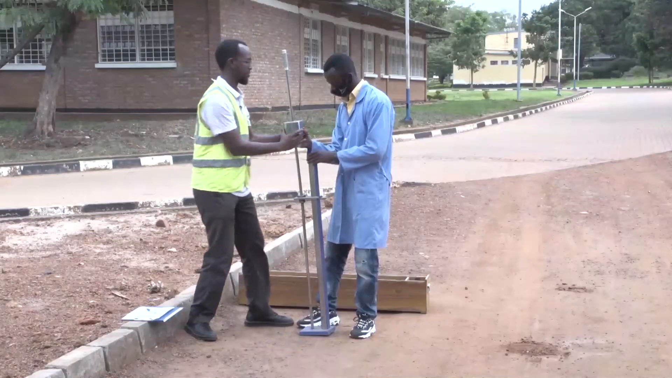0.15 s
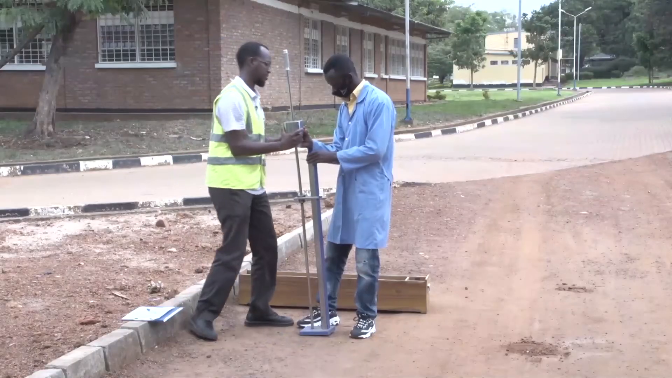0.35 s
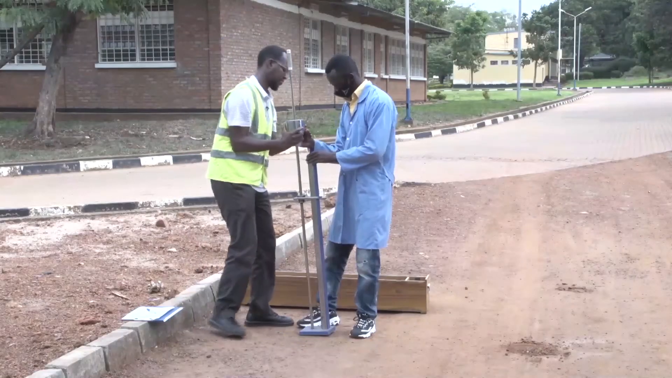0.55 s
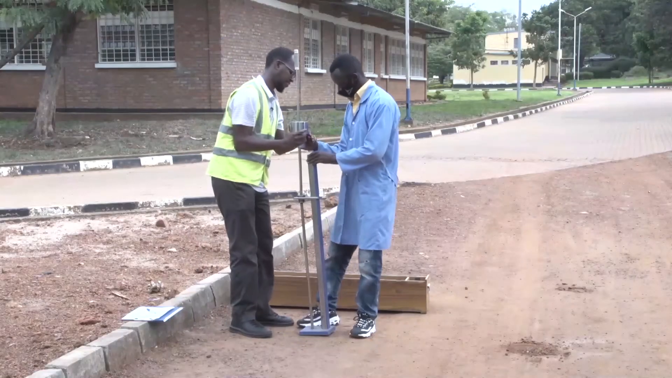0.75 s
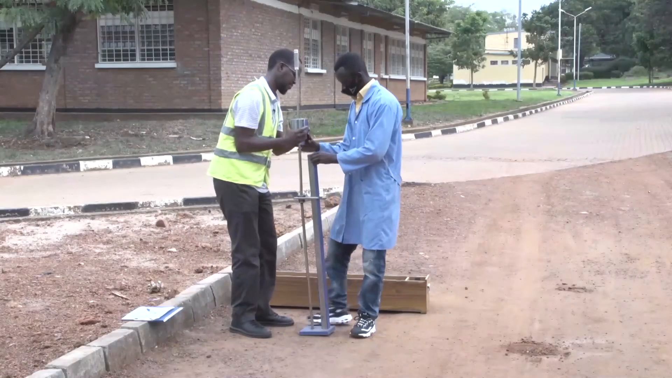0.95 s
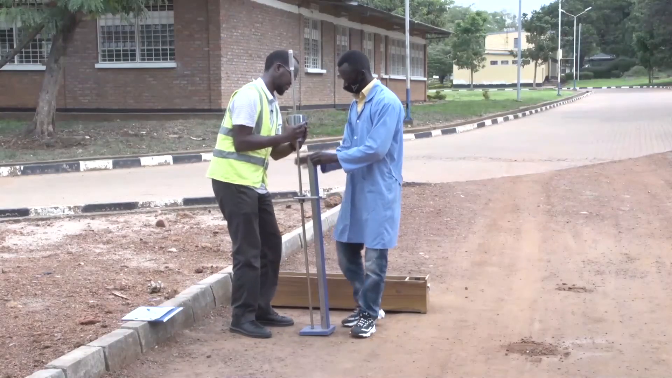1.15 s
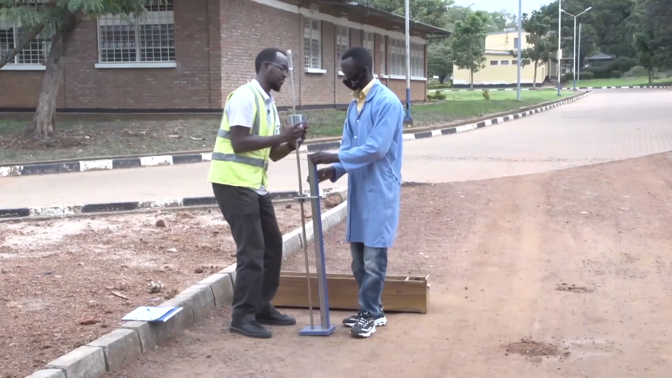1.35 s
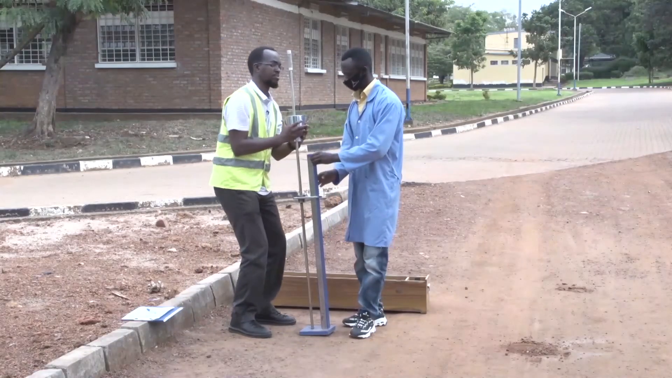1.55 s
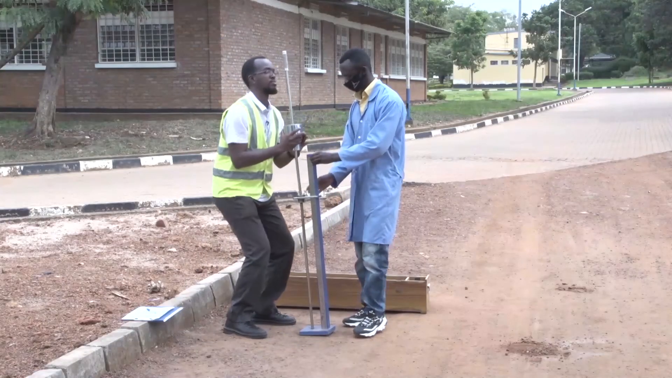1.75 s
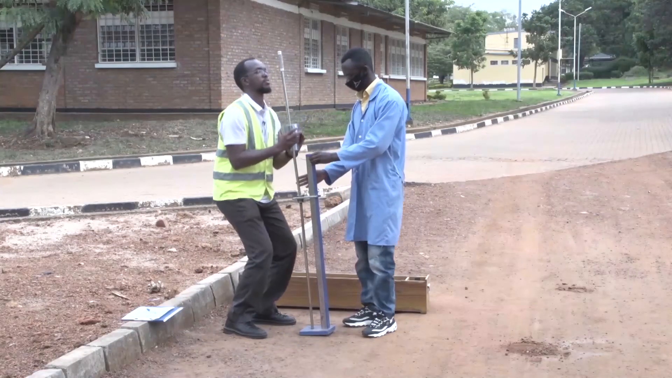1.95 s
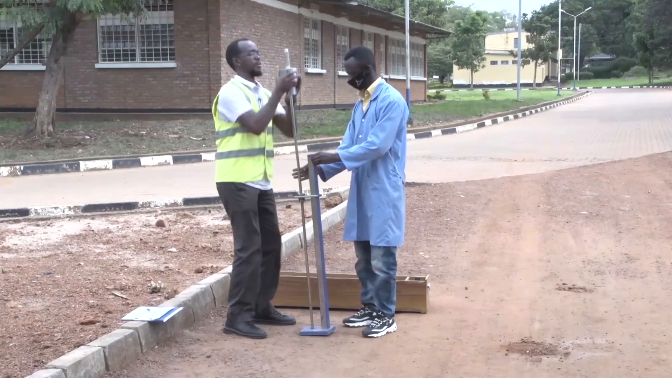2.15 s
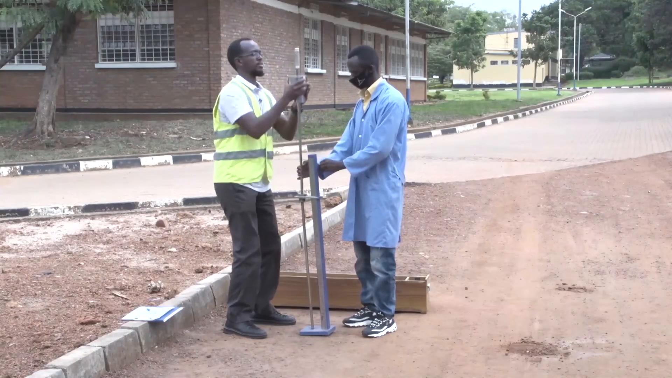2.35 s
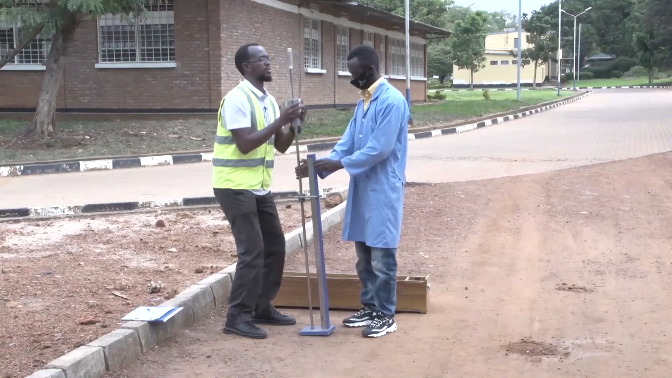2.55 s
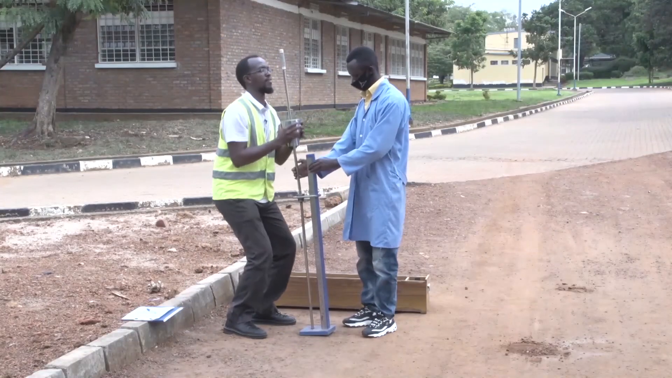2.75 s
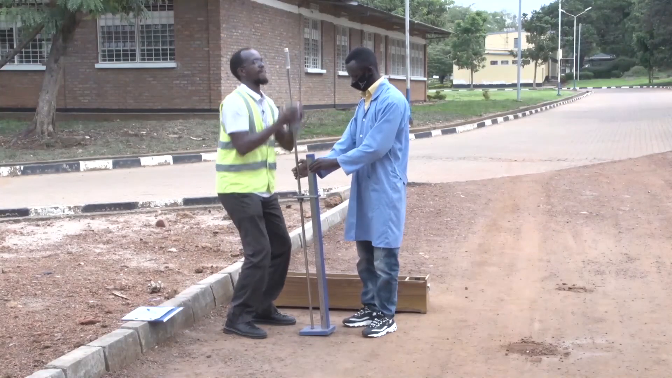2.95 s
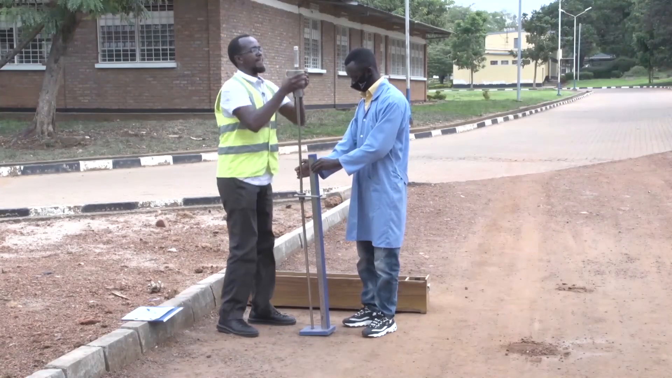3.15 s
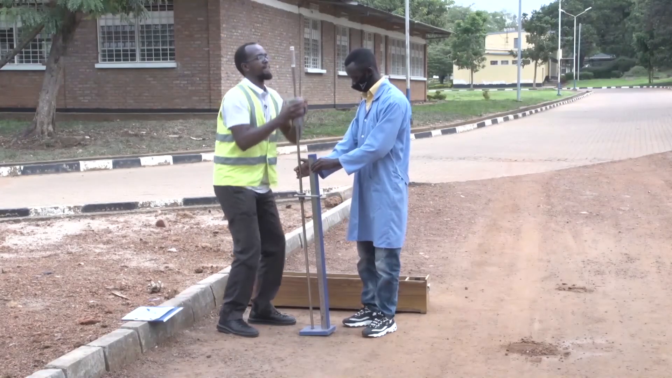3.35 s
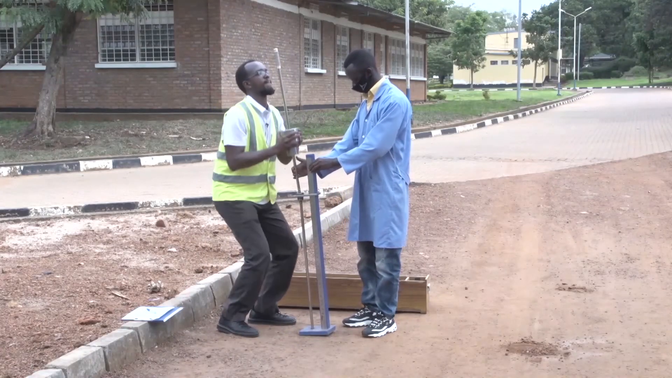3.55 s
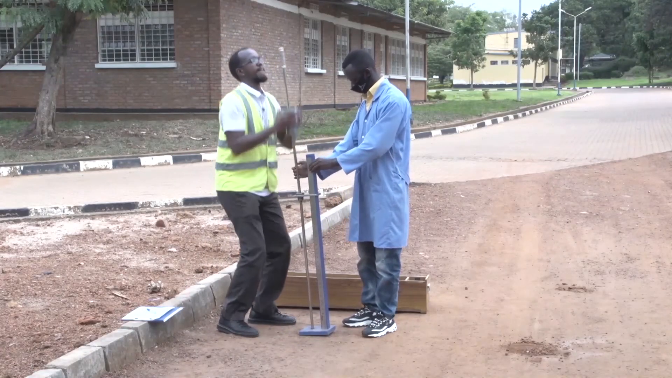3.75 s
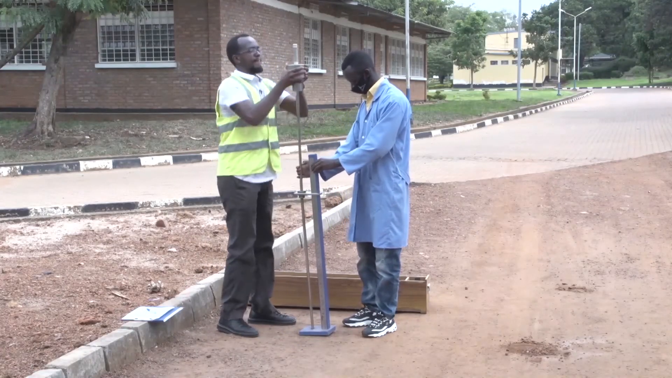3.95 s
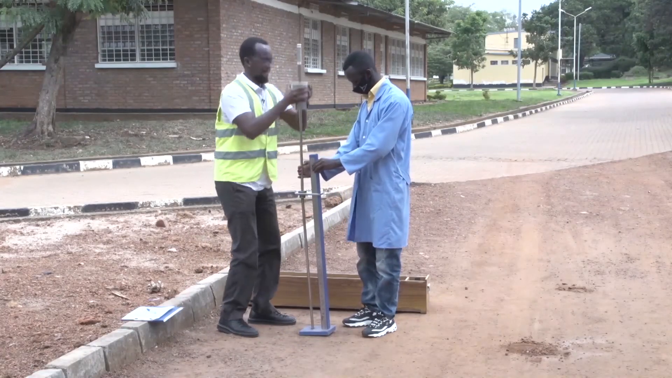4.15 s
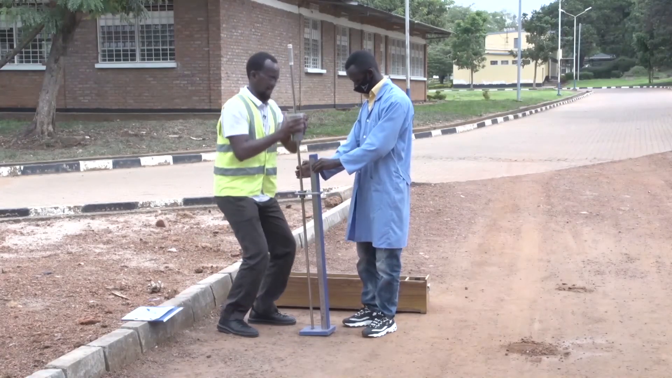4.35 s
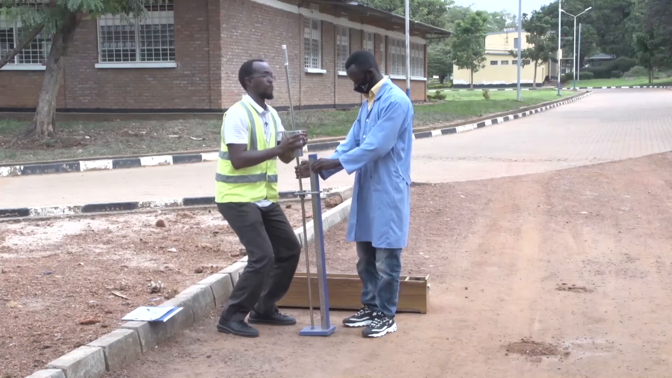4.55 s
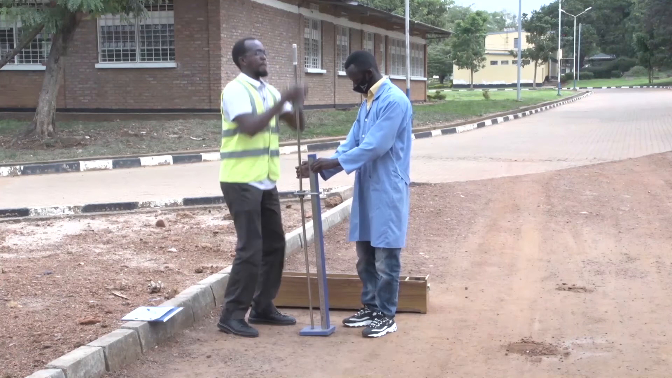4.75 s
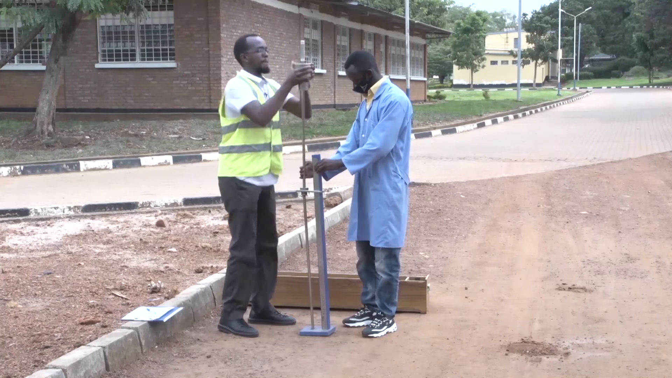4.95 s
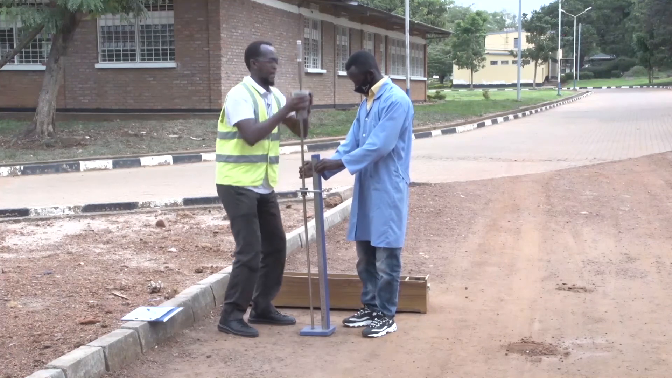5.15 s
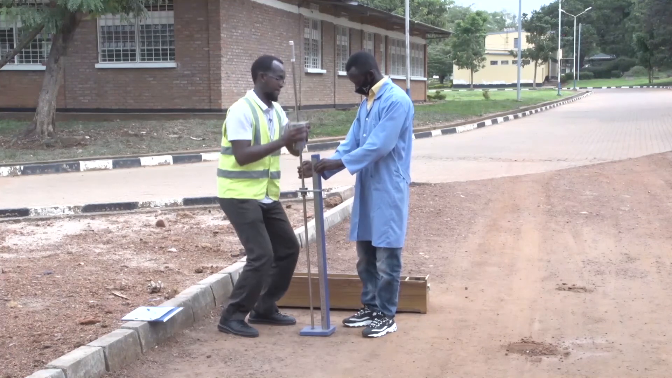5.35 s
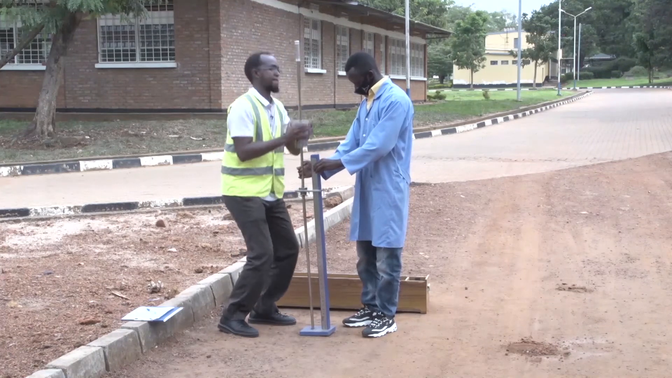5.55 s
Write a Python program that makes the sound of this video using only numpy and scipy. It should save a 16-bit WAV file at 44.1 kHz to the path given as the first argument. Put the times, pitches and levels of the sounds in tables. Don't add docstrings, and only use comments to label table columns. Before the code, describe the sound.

A steel weight scrapes up its rod and slams a handle four times with sharp, overloaded metallic clanks, squeaking back down between blows outdoors.

```python
import sys
import numpy as np
from scipy import signal
from scipy.fft import rfft, irfft
from scipy.io import wavfile
from scipy.ndimage import uniform_filter1d

SR = 44100
rng = np.random.default_rng(int(sys.argv[2]) if len(sys.argv) > 2 else 0)


def voltage_ratio(level):
    return 10 ** (np.asarray(level, float) / 20)


def bounce(signal):
    frames = np.transpose(np.atleast_2d(signal))
    limited = np.clip(frames, -1, 1)
    pcm = np.round(limited * 32767).astype(np.int16)
    wavfile.write(sys.argv[1], SR, pcm)


N = 247401

# time in seconds, traffic level in dB, motor hum level in dB.
STREET = [(0, -63, -86), (.55, -66, -78), (1.22, -62.5, -69), (1.48, -64.5, -68), (2.09, -61, -73),
          (2.4, -62, -72), (2.97, -61.5, -74), (3.2, -60, -75.5), (3.4, -63, -69), (3.8, -63, -71),
          (4.2, -64.5, -76.5), (4.8, -61.5, -69.5), (5.35, -63.5, -79), (5.61, -62.5, -68.5)]
# frequency in Hz, level in dB per Hz.
TRAFFIC = [(15, -42.5), (25, -16), (54, 1), (75, -16.5), (123, 4), (155, -7), (248, -3), (320, -8.5),
           (499, -3), (2070, -21), (4000, -27.5), (5200, -58), (8800, -120)]
# frequency in Hz, level in dB.
HUM = [(129.2, 2), (258.4, -13.5)]
# frequency in Hz, level in dB per Hz.
HISS = [(880, -28), (1500, -7), (1660, -12), (3090, -12), (3620, -8), (4420, -11.5), (16000, -13)]
# time in seconds, gain in dB.
GAIN = [(0, 2), (1, 4.5), (2.19, 7.5), (2.21, -0.5), (5.61, -1.5)]
# frequency in Hz, left minus right in dB.
LEFT_BIAS = [(100, 2.5), (1000, 2), (4000, 2), (15000, 2)]
# start in seconds, length in seconds, level in dB.
SCUFFS = [(0.248, 0.07205, -70.5), (0.471, 0.0443, -68), (0.863, 0.1739, -65.5), (1.188, 0.07144, -60.5),
          (1.695, 0.046, -62), (1.799, 0.4116, -64.5)]
# frequency in Hz, level in dB per Hz.
DIRT = [(800, 11), (1200, -2.5), (2200, -4.5), (3500, -11), (5000, -39.5)]
# start in seconds, peak in dB, pitch in Hz, 60 dB decay in seconds.
KNOCKS = [(2.291, -38, 548.5, 0.02509), (2.33, -44, 62, .12), (2.343, -32, 579.7, 0.03209),
          (2.541, -46.5, 558, 0.0611), (3.138, -31.5, 550.8, 0.04886), (3.32, -48, 58, .12),
          (3.655, -42, 96.4, 0.08688), (3.925, -34.5, 45.19, 0.1082), (4.009, -39, 545, 0.02226),
          (4.863, -30, 550, .05), (4.9, -32, 566.1, 0.03702), (5.495, -42, 92.2, 0.12252)]
# start in seconds, peak in dB, knock in dB, chatter 60 dB decay in seconds, knock pitch in Hz.
TAPS = [(1.0847, -31.5, 3.5, 0.02564, 1666), (1.1023, -40.5, -1.5, 0.02879, 1510),
        (1.1745, -41, 7, 0.02693, 2090), (2.0706, -40, 4, 0.0165, 1945), (2.1034, -42, -2, 0.02027, 2100),
        (2.2517, -37.5, -1, 0.0196, 2991), (2.3425, -33.5, 0, 0.0417, 3025),
        (2.3504, -43, 7.5, 0.0757, 1497), (2.3796, -31, 5.5, 0.02005, 1733),
        (2.3889, -36, 3, 0.01766, 2860), (2.3943, -35.5, 9.5, 0.0515, 3277),
        (2.453, -44, 2.5, 0.03326, 1305), (2.5567, -54, 11, 0.02182, 2416),
        (2.626, -54.5, 13.5, 0.0295, 2997), (2.688, -51.5, 3.5, 0.04, 3114),
        (4.0086, -43.5, 12, 0.0178, 1900), (4.235, -52.5, 15.5, 0.02674, 3711),
        (4.8737, -27, -5.5, 0.01875, 2980)]
# start in seconds, peak in dB, knock in dB, level above 9 kHz in dB, knock pitch in Hz.
TICKS = [(1.134, -46, -3, -9, 2000), (1.924, -38, 14, -2.5, 1800), (2.004, -48.5, 7.5, -8.5, 3500),
         (2.329, -44, 12, -6.5, 1700), (2.422, -48, 6.5, -8.5, 2500), (2.7404, -56.5, 5.5, -7.5, 3000),
         (2.9022, -51, -3.5, -4.5, 2000), (3.274, -37, 1, 0, 1300), (3.4997, -44, -3, -9, 1800),
         (4.0715, -33, -1.5, 6, 1200), (4.1736, -53, 3, -5, 3000), (4.347, -35, 16, -5, 2250),
         (5.3652, -52.5, 13.5, -5.5, 2400)]
# frequency in Hz, level in dB.
TAP_MODES = [(2950, -3), (4200, -1), (4620, -3.5), (5850, -4), (6450, -7.5), (7000, -5.5), (7600, -0.5),
             (8720, -0.5), (9800, 1), (11300, 0.5), (13300, 0)]
# frequency in Hz, width in Hz, level in dB.
SQUEAL = [(1747.5, 120, -8), (1839.3, 91, 4), (1900, 210, 1)]
# frequency in Hz, width in Hz, level in dB.
RASP = [(3042, 170, -1.5), (3685.2, 130, -2), (3987, 400, 0), (5122.5, 480, -1.5), (5832, 66, -7),
        (5536, 660, -7), (7229.3, 110, -6.5), (8440, 120, -9.5), (9036, 170, -3.5), (10260, 200, -13)]
# frequency in Hz, level in dB per Hz.
GRIT = [(1200, -4.5), (2500, -2), (4500, -6), (7000, -10.5), (11000, -10.5), (15000, -20.5)]
# length in seconds, squeal in dB and rasp in dB at the top.
THROWS = [
    (0.2, -50.5, -49),
    (0.14, -50, -54.5),
    (0.2, -51, -56),
    (0.18, -50, -53),
]
# start in seconds, length in seconds, squeal in dB, rasp in dB.
DRAGS = [(2.488, 0.13697, -74, -70.5), (2.669, 0.09694, -66, -64.5), (3.28, 0.14, -66.5, -69),
         (3.38, 0.17, -69.5, -66), (3.502, 0.035, -63, -62.5), (3.557, 0.07544, -71.5, -72.5),
         (4.087, 0.1286, -69.5, -70), (4.214, 0.04735, -65, -67.5), (4.268, 0.06767, -63, -65.5),
         (4.325, 0.15226, -63, -71), (5.031, 0.1363, -66.5, -67), (5.134, 0.1261, -62, -64),
         (5.255, 0.14465, -57, -67), (5.561, 0.0985, -69, -70)]
# start in seconds, length in seconds, start pitch in Hz, end pitch in Hz, level in dB.
SQUEAKS = [(2.51, .05, 1650, 1750, -64), (2.57, .07, 1850, 1950, -64), (2.56, .09, 2600, 3100, -68),
           (2.955, .02, 3400, 3350, -60), (2.972, .02, 3700, 3600, -61), (3.03, .06, 8950, 8850, -66),
           (3.44, .09, 2200, 3200, -65), (3.855, .035, 8950, 8850, -62), (4.28, .04, 3350, 3250, -65),
           (4.28, .04, 2050, 2000, -62), (4.35, .1, 1850, 1900, -60), (4.69, .06, 1750, 2050, -62),
           (5.05, .08, 1800, 1650, -62), (5.19, .06, 2800, 3400, -64), (5.165, .035, 5000, 4950, -66),
           (5.17, .05, 6900, 6900, -68), (5.28, .08, 1850, 1950, -54), (5.35, .06, 1900, 1780, -57),
           (5.33, .08, 7700, 7900, -77), (5.15, .04, 9000, 8750, -71), (5.165, .04, 3350, 3600, -66)]
# middle in seconds, pitch in Hz, level in dB.
BITES = [(2.072, 1945, -55.5), (2.105, 2134, -53.5), (2.107, 8893, -55), (2.131, 1384, -53.5),
         (2.138, 3606, -57.5), (2.14, 4457, -53), (2.151, 3203, -57), (2.152, 2229, -49.5),
         (2.154, 4189, -53.5), (2.158, 8910, -58), (2.166, 2859, -56), (2.174, 1758, -55),
         (2.174, 3530, -51), (2.174, 8887, -59.5), (2.181, 4269, -52), (2.996, 2110, -60.5),
         (3.005, 2037, -62), (3.027, 2098, -66), (3.027, 9283, -65), (3.042, 1293, -56.5),
         (3.046, 8893, -61.5), (3.047, 2139, -55.5), (3.047, 4350, -66.5), (3.049, 3083, -63.5),
         (3.063, 2888, -58.5), (3.069, 3360, -60.5), (3.071, 8910, -70), (3.072, 1720, -51),
         (3.793, 3476, -62), (3.794, 2143, -57), (3.794, 8304, -68.5), (3.802, 6200, -65.5),
         (3.805, 8140, -67.5), (3.81, 3920, -59), (3.81, 9049, -68), (3.816, 2403, -64.5),
         (3.825, 6460, -62.5), (3.835, 3902, -56), (3.848, 3270, -60.5), (3.864, 2930, -63.5),
         (3.864, 3564, -66), (3.866, 1822, -55.5), (3.871, 8892, -62.5), (4.718, 1980, -58.5),
         (4.736, 2075, -60), (4.742, 4029, -59.5), (4.751, 2274, -57), (4.753, 8969, -64.5),
         (4.756, 4154, -64.5), (4.762, 1854, -54.5), (4.787, 1912, -57), (4.799, 3880, -67.5),
         (4.811, 3320, -63.5), (4.812, 1636, -57), (4.815, 6998, -64.5), (4.815, 8904, -63),
         (4.823, 1920, -53.5), (4.824, 5210, -55.5)]
# start in seconds, crack in dB, free ringing in seconds, thud in dB.
BLOWS = [
    (2.1961, -1, 0.0483, -9.5),
    (3.0929, -4, 0.05992, -15),
    (3.8945, -5, 0.044, -19),
    (4.8395, -7, 0.054975, -16),
]
# time in seconds, level in dB, 60 dB decay in seconds.
CONTACTS = [
    [(2.197, 0, 0.031), (2.2015, -4.5, 0.019), (2.2088, -18, .02), (2.2165, -30.5, .03),
     (2.237, -38, 0.03538), (2.245, -39.5, 0.03343)],
    [(3.0932, 1, 0.029593), (3.0958, -5, 0.03192), (3.1045, -18, .02), (3.1115, -25, .02),
     (3.119, -28.5, .03)],
    [(3.8953, -1.5, 0.03196), (3.8963, -1, 0.02456), (3.8987, -4, 0.01024), (3.9015, -12.5, 0.03701),
     (3.9125, -24, 0.02714), (3.9195, -29.5, .02), (3.926, -33, .03)],
    [(4.8398, -7, 0.0131), (4.8408, 3.5, 0.012684), (4.843, -13.5, 0.06329), (4.847, -13.5, 0.01699),
     (4.8495, -13.5, 0.0329), (4.865, -26, 0.04415)],
]
# frequency in Hz, level in dB per Hz.
CRACK = [(350, -43), (600, -13.5), (2040, -2), (4460, -10), (5190, -1), (6920, -11.5), (9890, -6),
         (10700, -10.5), (16000, -19.5)]
# frequency in Hz, 60 dB decay in seconds, levels in dB in blows 1, 2, 3, 4.
CLANK = [(171, 0.0066, -16.5, -19, -24, -21), (507.14, 0.041, -11.5, -17, -13, -19.5),
         (780, 0.02, -4, -6.5, -1, -8), (950, .025, -14, -18, -5, -16), (1187.8, 0.03, -12, -16, -19, -17),
         (1581.1, 0.047, -3, -20, -17, -21), (1950, .03, -16, -3, -18, -18),
         (2300, .02, -12, -10, -24, -12), (2920, .02, -16, -20, -4, -20), (5600, .015, -14, -8, -12, -4)]
# frequency in Hz, width in Hz, level in dB.
STEEL = [
    [(2090, 130, -4.5), (2666, 92, -5.5), (3534.8, 89, -9), (5159.2, 150, -1.5), (6363, 100, -9.5),
     (6835, 290, -14), (8075, 97, -14.5), (8720, 130, -6.5), (9128, 120, -9.5), (9740, 130, 0),
     (10324, 110, -9), (12070, 120, -13.5), (14255, 250, -18)],
    [(1590, 110, -1.5), (2740.2, 250, -8.5), (3470, 170, -11), (5280, 100, 1), (6400, 100, -5.5),
     (6740, 89, -5.5), (7600.8, 180, -3), (8714, 290, -7.5), (9964, 130, -2), (11073, 180, -9.5),
     (12128, 230, -7), (13500, 190, -11.5), (14500, 280, -9.5)],
    [(1900, 110, -6), (2879.5, 220, -3.5), (3360, 110, -7.5), (5210, 180, 1.5), (5560, 92, -9.5),
     (6673.4, 130, -7.5), (7406, 150, -12.5), (8631, 87, -12), (9843.5, 140, -6.5), (10111, 120, -16),
     (11663, 170, -15.5), (13266, 110, -12.5), (14240, 180, -18.5)],
    [(1731.9, 200, -2), (2915.2, 330, 1.5), (3320, 200, -3), (3988.9, 180, -3.5), (5351, 160, 0),
     (6163.2, 110, -9), (6553.1, 93, -13.5), (8040, 150, -6), (8680.6, 120, -9.5), (9689.8, 180, -6.5),
     (10419, 150, -14.5), (12466, 120, -12), (13400, 330, -15.5)],
]
STEEL_DB = [-10, -10, -9, -9]
# frequency in Hz, 60 dB decay in seconds, levels in dB in blows 1, 2, 3, 4.
RING = [(545, 0.36, -56.5, -39, -41, -36), (1096.2, 0.31, -60, -48.5, -44.5, -48),
        (1820, 0.21, -51.5, -43.5, -49, -38), (2030, 0.18, -52.5, -46.5, -50, -48),
        (2930, 0.11, -51, -45.5, -47.5, -39.5), (4124, 0.5, -54.5, -56, -51.5, -51.5),
        (4313, .2, -55, -49.5, -42, -49), (5218, .25, -47.5, -53, -43, -52.5),
        (6200, 0.31, -59, -46, -41, -36), (8781, .15, -48.5, -45.5, -51, -46.5),
        (9700, .12, -43.5, -52.5, -50, -44), (13350, .2, -58, -51, -53, -53.5),
        (14540, .2, -56.5, -55.5, -57, -32.5)]
# frequency in Hz, 60 dB decay in seconds, levels in dB in blows 1, 2, 3, 4.
LINGER = [(1826.7, .4, -66.5, -67, -60, -70), (4350, 0.36, -60.5, -69.5, -61.5, -64.5),
          (4655, .3, -65.5, -68.5, -60, -65.5), (5114.7, .9, -72, -72, -63.5, -71),
          (5110, .6, -70, -71, -65, -70), (5226, .3, -67, -65, -61, -67),
          (8835, 0.45, -69, -65.5, -63, -63), (9908, .3, -55, -63, -66, -66.5)]
# rattling tail in dB, far echoes in dB, ground boom in dB.
AFTERMATH = [
    (-39, -47, -29),
    (-36.5, -52, -27),
    (-35.5, -49, -27),
    (-35, -52, -31),
]
# frequency in Hz, level in dB per Hz.
TAIL = [(300, -8.5), (700, -5), (1800, -2), (4500, -4), (7000, -6.5), (10000, -7.5), (13000, -11.5),
        (16000, -17.5)]
# frequency in Hz, 60 dB decay in seconds.
TAIL_T60 = [(300, 0.055), (1500, 0.3), (5000, 0.18), (15000, 0.14)]
# frequency in Hz, level in dB per Hz.
FAR = [(900, -6.5), (2000, 0.5), (5000, -2), (9000, -4.5), (12000, -11.5), (15000, -21.5)]


def rms_one(x):
    return x / np.sqrt(np.mean(x ** 2) + 1e-20)


def peak_one(x):
    return x / np.abs(x).max()


def in_time(rows):
    s, *columns = np.transpose(rows)
    return [np.interp(np.arange(N) / SR, s, c) for c in columns]


def at_hz(points, hz):
    table_hz, values = np.transpose(points)
    return np.interp(np.log(hz), np.log(table_hz), values)


def add(track, s, sound):
    i = round(s * SR)
    track[i:i + len(sound)] += sound[:N - i]


def dying(t, t60):
    return voltage_ratio(-60 * t / t60)


def drift(rate, size=N):
    knots = rng.standard_normal(int(size / SR * 800) + 2)
    return np.interp(np.arange(size) / SR * min(rate, 800), np.arange(len(knots)), knots)


def band_pass(x, low_hz, high_hz):
    return signal.sosfilt(signal.butter(2, [low_hz, high_hz], "band", fs=SR, output="sos"), x)


def ring(clicks, hz, t60):
    r, w = dying(1 / SR, t60), 2 * np.pi * hz / SR
    return signal.lfilter([0, np.sin(w)], [1, -2 * r * np.cos(w), r * r], clicks + 1e-18)


def bands(spectrum, shape, size):
    low_end, high_end = spectrum[0][0], spectrum[-1][0]
    edges = np.geomspace(low_end, high_end, int(2 * np.log2(high_end / low_end)) + 1)
    white = rng.standard_normal((2, size))
    out, flat = 0, 0
    for k, (low, high) in enumerate(zip(edges, edges[1:])):
        hz = np.sqrt(low * high)
        band = voltage_ratio(at_hz(spectrum, hz)) * band_pass(white[k % 2], low, high)
        out = out + band * shape(hz)
        flat = flat + band
    return out / np.sqrt(np.mean(flat ** 2))


def street():
    traffic_db, hum_db = in_time(STREET)
    gain_db = in_time(GAIN)[0]
    rumble = bands(TRAFFIC, lambda hz: voltage_ratio(0.57 * drift(8.9)), size=N)
    seconds = np.cumsum(1 + 0.0064 * drift(7.9)) / SR
    hum = sum(voltage_ratio(db) * np.sin(2 * np.pi * hz * seconds) for hz, db in HUM)
    return voltage_ratio(traffic_db + gain_db - 2.5) * rumble + voltage_ratio(hum_db + gain_db + 4.2) * hum


def camera_noise():
    ticks = np.zeros(N)
    at = np.arange(round(0.0097 * SR), N, SR // 50)
    ticks[at] = voltage_ratio(rng.normal(0, 1.0, len(at)))
    buzz = band_pass(ticks, 250, 740)
    buzz = voltage_ratio(-55) * buzz / np.median(buzz[at + 12])
    hiss = voltage_ratio(-72.5) * bands(HISS, lambda hz: 1, size=N)
    whine = voltage_ratio(-86.5) * np.sin(2 * np.pi * 12700 * np.arange(N) / SR + 3.5 * drift(60))
    return voltage_ratio(in_time(GAIN)[0]) * (buzz + hiss + whine)


def scuffs():
    out = np.zeros(N)
    for s, length_s, db in SCUFFS:
        size = round(length_s * SR)
        grit = bands(DIRT, lambda hz: voltage_ratio(3.5 * drift(69.6, size=size)), size=size)
        add(out, s, voltage_ratio(db) * grit * np.sin(np.pi * np.arange(size) / size))
    return out


def knocks():
    out, t = np.zeros(N), np.arange(SR // 4) / SR
    for s, peak_db, hz, t60 in KNOCKS:
        swell = 1 - np.exp(-t * hz / 1.1)
        add(out, s, voltage_ratio(peak_db) * np.sin(2 * np.pi * hz * t) * swell * dying(t, t60))
    return out


def chatter(t, t60):
    contacts = rng.standard_normal(len(t)) * rng.exponential(1, len(t))
    return contacts * (1 - np.exp(-t / 0.0001)) * dying(t, t60)


def tap(t, knock_db, high_db, knock_hz, t60):
    push = chatter(t, max(t60, .001)) + 4.9 * (t == 0)
    modes = 0
    for hz, db in TAP_MODES:
        treble_db = high_db * (int(hz > 9000) + int(hz > 12000))
        mode_db = db + rng.normal(0, 1.7) + treble_db
        modes = modes + voltage_ratio(mode_db) * peak_one(ring(push, hz, 0.0038))
    knock = peak_one(ring(push, knock_hz, .008)) + 0.93 * peak_one(ring(push, 1.25 * knock_hz, .004))
    edge = peak_one(band_pass(push, 3000, 6900))
    edge = edge + voltage_ratio(1.5 * high_db) * peak_one(band_pass(push, 9000, 9600))
    after_ring = peak_one(ring(push, 8900, 0.078) + 0.51 * ring(push, 7500, 0.06))
    return modes + voltage_ratio(-10.5) * after_ring + voltage_ratio(-1) * edge + voltage_ratio(knock_db + 4.0) * knock


def taps():
    out, t = np.zeros(N), np.arange(SR // 12) / SR
    no_bass = signal.butter(3, 900, "high", fs=SR, output="sos")
    tap_high_db, tick_t60_s = -14, 0.008215
    touches = [(s, db, knock_db, tap_high_db, hz, t60) for s, db, knock_db, t60, hz in TAPS]
    touches += [(*tick, tick_t60_s) for tick in TICKS]
    for s, peak_db, knock_db, high_db, knock_hz, t60 in touches:
        touch = tap(t, knock_db, high_db, knock_hz, t60)
        add(out, s, voltage_ratio(peak_db) * peak_one(signal.sosfilt(no_bass, touch)))
    return out


def scrape(modes, per_s, patchy_db, size=N):
    strength = voltage_ratio(2.0 * np.minimum(rng.exponential(1, size), 3))
    slips = (rng.random(size) < per_s / SR) * rng.standard_normal(size) * strength
    out = 0
    for hz, width, db in modes:
        twice = ring(ring(slips, hz, 1.0 / width), hz, 1.0 / width)
        out = out + voltage_ratio(db + patchy_db * drift(35, size=size)) * rms_one(twice)
    return rms_one(out)


def squeak(length_s, start_hz, end_hz, clear):
    t = np.arange(round(length_s * SR)) / SR
    hz = start_hz + (end_hz - start_hz) * t / length_s
    blur = clear + drift(260, size=len(t))
    return np.sin(2 * np.pi * np.cumsum(hz) / SR) * np.sin(np.pi * t / length_s) * blur


def strokes():
    t, levels = np.arange(N) / SR, np.full((2, N), -120.)
    squeal_rise_db, rasp_rise_db, rasp_grip_db, grip_share = 33.5, 8, 15.5, 0.4533
    lift_off_s, lift_off_db_per_s = 0.012, 899.5
    drag_edge_db = 9
    for (blow_s, *_), (length_s, squeal_db, rasp_db) in zip(BLOWS, THROWS):
        left = (blow_s - lift_off_s - t) / length_s
        loose = np.maximum(left - grip_share, 0) / (1 - grip_share)
        throw = [squeal_db - squeal_rise_db * left, rasp_db - rasp_rise_db * left - rasp_grip_db * loose]
        easing = np.array([[squeal_db], [rasp_db]]) + lift_off_db_per_s * length_s * left
        levels = np.where(t < blow_s, np.maximum(levels, np.minimum(throw, easing)), levels)
    for s, length_s, squeal_db, rasp_db in DRAGS:
        off_middle = 2 * (t - s) / length_s - 1
        drag = np.array([[squeal_db], [rasp_db]]) - drag_edge_db * off_middle ** 2
        levels = np.maximum(levels, drag)
    return uniform_filter1d(levels, size=200)


def streaks():
    out = np.zeros(N)
    for place, pitch, glide, size in rng.random((2500, 4)):
        hz = 2300 * 3.2 ** pitch ** 2.3
        streak = squeak(.008 + 0.014 * size, hz, hz * (0.9 + 0.15 * glide), clear=.3)
        add(out, place * N / SR, voltage_ratio(5 * size) * streak)
    return rms_one(out)


def slides():
    squeal = scrape(SQUEAL, 4000, patchy_db=3.5)
    rasp = scrape(RASP, 2600, patchy_db=4.0)
    grit = bands(GRIT, lambda hz: voltage_ratio(2.5 * drift(60)), size=N)
    squeal_db, rasp_db = strokes()
    friction = voltage_ratio(-7.5) * rasp + voltage_ratio(-7.0) * streaks() + voltage_ratio(-4.5) * grit
    out = voltage_ratio(squeal_db - 2.5) * squeal + voltage_ratio(rasp_db + 2.5 * drift(220)) * friction
    for s, length_s, start_hz, end_hz, db in SQUEAKS:
        add(out, s, voltage_ratio(db - 3.5) * squeak(length_s, start_hz, end_hz, clear=0.91))
    bite_s, sag_hz = .017, 90
    for s, hz, db in BITES:
        bite = squeak(bite_s, hz + sag_hz, hz - sag_hz, clear=1.3) / 1.3
        add(out, s - bite_s / 2, voltage_ratio(db + 1.5) * bite)
    return out


def landing(k, t):
    force = 0
    for s, db, t60 in CONTACTS[k]:
        since = np.maximum(t + BLOWS[k][0] - s, 0)
        force = force + voltage_ratio(db) * (1 - np.exp(-since / 0.00027)) * dying(since, t60)
    return force


def impact(k, t):
    _, crack_db, _, thud_db = BLOWS[k]
    force = landing(k, t)
    strike = np.maximum(np.diff(force, prepend=0), 0) ** 2
    crack = force * bands(CRACK, lambda hz: voltage_ratio(2.6 * drift(260, size=len(t))), size=len(t))
    modes = [(hz, .5 * t60, db[k] - 12.0) for hz, t60, *db in CLANK]
    modes += [(hz, 2.2 / (width * 1.4), db + STEEL_DB[k]) for hz, width, db in STEEL[k]]
    clank = 0
    for m, (hz, t60, db) in enumerate(modes):
        rough = peak_one(ring(force ** 1.3 * rng.standard_normal(len(t)), hz, t60))
        clean = (-1) ** m * peak_one(ring(strike, hz, t60))
        clank = clank + voltage_ratio(db) * (rough + 1.2 * clean)
    thud = np.sin(2 * np.pi * 270 * t) + 0.43 * np.sin(2 * np.pi * 110 * t)
    thud = voltage_ratio(thud_db) * thud * dying(t, 0.014)
    no_rumble = signal.butter(2, 75, "high", fs=SR, output="sos")
    return signal.sosfilt(no_rumble, voltage_ratio(crack_db - 6.0) * crack + clank + thud)


def struck(t, modes, k, broken_db):
    out = 0
    for hz, t60, *db in modes:
        level = voltage_ratio(db[k] + broken_db * drift(45, size=len(t)))
        out = out + level * np.sin(2 * np.pi * (hz * t + rng.random())) * dying(t, t60)
    return out


def after_blow(k, t):
    free_s = BLOWS[k][2]
    tail_db, far_db, _ = AFTERMATH[k]
    size = len(t)
    caught = dying(np.maximum(t - free_s, 0), 0.12)

    def tail_shape(hz):
        return dying(t, at_hz(TAIL_T60, hz)) * voltage_ratio(2.7 * drift(99, size=size))

    scatter = bands(TAIL, tail_shape, size=size)
    rattle = voltage_ratio(-4.5) * scrape(RASP, 3400, patchy_db=6.5, size=size) * dying(t, 0.2)
    echoes = bands(FAR, lambda hz: voltage_ratio(1.5 * drift(40, size=size)), size=size) * dying(t, 0.58)
    shake = voltage_ratio(-47.5) * np.sin(2 * np.pi * 45 * t) * dying(t, .3)
    free = struck(t, RING, k, broken_db=2.5) + shake + voltage_ratio(tail_db) * (scatter + rattle)
    linger = struck(t, LINGER, k, broken_db=4.0) * (1.3 + .7 * drift(160, size=size))
    return free * caught + linger + voltage_ratio(far_db) * echoes


def blows():
    out, t, short = np.zeros(N), np.arange(SR * 2 // 5) / SR, np.arange(SR // 10) / SR
    for k, (s, *_) in enumerate(BLOWS):
        boom = voltage_ratio(AFTERMATH[k][2]) * np.sin(2 * np.pi * 68 * short) * dying(short, .04)
        add(out, s, impact(k, short) + boom)
        add(out, s, after_blow(k, t))
    return out


def capsules(mid, bias):
    spectrum, hz = rfft(mid), np.maximum(np.arange(N // 2 + 1) * SR / N, 1)
    late = voltage_ratio(-34) * np.exp(-2j * np.pi * hz * 0.00096)
    tilt = voltage_ratio(bias * at_hz(LEFT_BIAS, hz) / 2)
    left = irfft(spectrum * (tilt + late), N)
    right = irfft(spectrum * (1 / tilt - late), N)
    return np.array([left, right])


def scene():
    quiet = street() + camera_noise() + scuffs() + knocks() + taps() + slides()
    return capsules(quiet, bias=0.87) + capsules(blows(), bias=.4)


def low_pass(x):
    return signal.sosfilt(signal.butter(12, 16490, fs=SR, output="sos"), x)


def record(dry):
    thin = signal.sosfilt(signal.butter(2, 30, "high", fs=SR, output="sos"), dry)
    overloaded = np.clip(thin, -.86, .86)
    cut = signal.cheby2(10, 60, 16800, fs=SR, output="sos")
    return low_pass(signal.sosfilt(cut, overloaded))


dry = scene()
out = record(dry)
bounce(out)
```